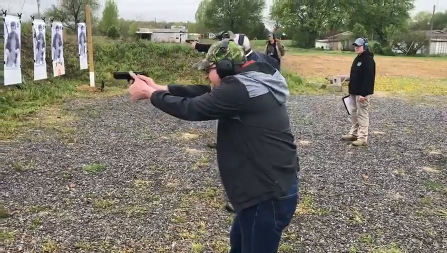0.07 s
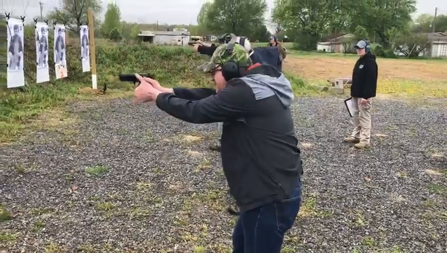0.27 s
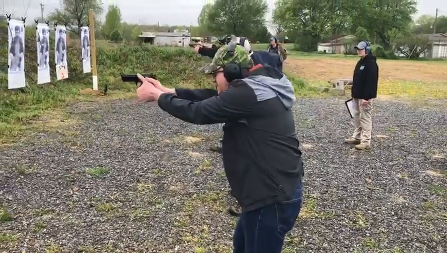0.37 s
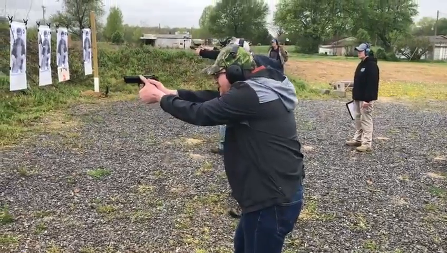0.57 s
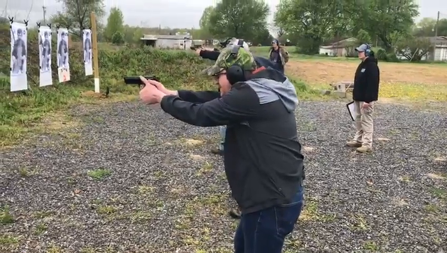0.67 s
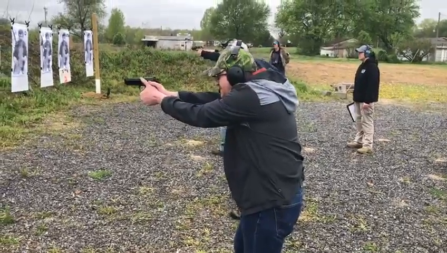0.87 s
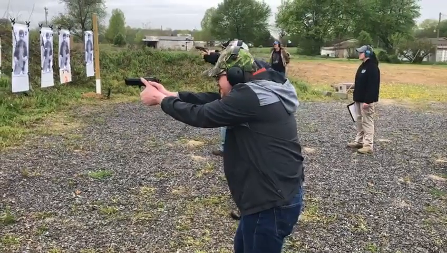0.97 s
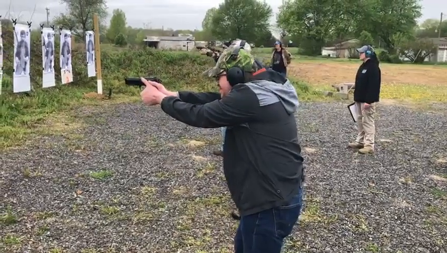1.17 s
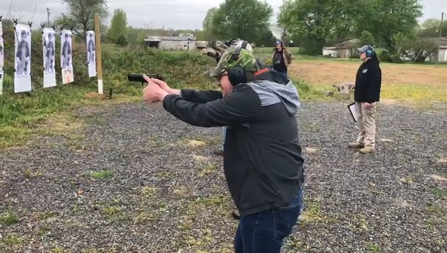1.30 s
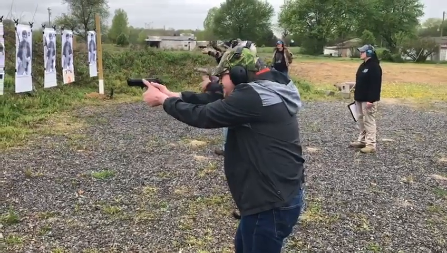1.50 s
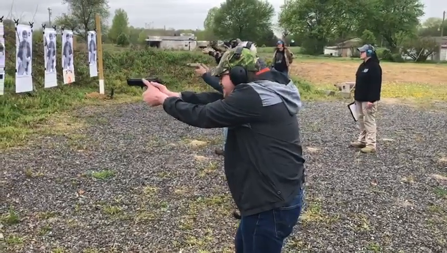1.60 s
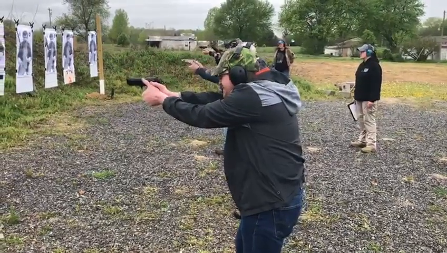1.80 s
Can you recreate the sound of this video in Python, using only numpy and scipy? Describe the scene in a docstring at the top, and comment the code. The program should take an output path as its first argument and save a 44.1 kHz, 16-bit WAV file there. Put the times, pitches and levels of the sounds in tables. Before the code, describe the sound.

Handgun shots outdoors, one alone and then four in quick succession, with short slapping echoes.

```python
"""Five handgun shots on an open gravel range, the microphone a phone a few metres behind the line.
Each bang is a treble crack and a tone that slides down into a short ring, with a wash off the gravel.
Ground, target frames, earth bank and a far tree line send it back as sharp slaps and as swarms of
small echoes, over a little wind rumble and a quiet outdoor floor. The phone rounds the loudest peaks
and cuts the top, and its audio compression puts a brief whistle and hiss just ahead of most bangs."""
import sys
import numpy as np
from scipy import signal
from scipy.fft import rfft, irfft
from scipy.io import wavfile
from scipy.ndimage import uniform_filter1d

SR = 44100
rng = np.random.default_rng(int(sys.argv[2]) if len(sys.argv) > 2 else 0)


def pcm_store(signal):
    """Save signal as 16-bit PCM."""
    levels = np.round(np.clip(np.atleast_2d(signal), -1, 1) * 32767)
    wavfile.write(sys.argv[1], SR, levels.astype(np.int16).T)


N = 81585

# Shots at the line: (time [s], ring level [dB], ring pitch [Hz], ring length [cycles],
# crack level before halving [dB], wash level [dB], wash t60 [s], linger level [dB])
HANDGUN_SHOTS = [(.2552, -9, 950, 7, -7.5, -24, 0.44, -28.5),
                 (0.8749, -5, 623, 5.7, -8.5, -18.5, 0.26, -26.5), (1.1903, -4, 690, 5, -13, -22, 0.2, -36),
                 (1.3047, -5, 553, 8, -9.5, -17.5, 0.26, -34),
                 (1.5458, -4, 580, 3.8, -11.5, -17.5, 0.19, -29.5)]
# Single echoes and far shots:
# (time [s], ring level [dB], ring pitch [Hz], ring length [cycles], crack level before halving [dB])
SLAP_ECHOES = [(0.059, -33.5, 915, 5.7, -75), (0.0781, -29.5, 644, 4.6, -79), (.092, -36, 595, 3.7, -75),
               (0.115, -36.5, 445, 4.1, -75), (.19, -44, 900, 3.6, -71), (.113, -49, 2000, 6, -53.5),
               (.143, -51, 1300, 5, -50), (.232, -20.5, 1000, 6.4, -20.5), (0.2652, -6, 650, 5.2, -21),
               (.351, -13.5, 684, 5, -32), (0.392, -15, 1170, 7.7, -59), (0.453, -21, 800, 5.7, -31),
               (0.699, -38, 1470, 12, -77), (.795, -38, 910, 6.6, -63), (0.8846, -7, 620, 4.2, -17),
               (.971, -12, 653, 3.1, -39), (1.01, -25, 1060, 10.3, -52), (1.073, -20.5, 870, 4.8, -34.5),
               (1.101, -31, 1250, 8.3, -50), (1.196, -17, 900, 5, -19), (1.319, -8, 730, 5.3, -18),
               (1.368, -24, 760, 11, -56), (1.401, -25, 2180, 11, -37), (1.4185, -24.5, 1850, 12, -50),
               (1.4313, -22, 990, 7.8, -28), (1.447, -23, 1100, 5.5, -51), (1.514, -20.5, 955, 6.7, -31),
               (1.533, -14.5, 1060, 9.8, -27), (1.553, -13, 950, 7, -31), (1.5695, -8, 780, 8, -45),
               (1.738, -25.5, 870, 4.9, -45)]
# Echo swarms from close by, the earth bank and the tree line: (peak time [s], level [dB], t60 [s])
NEAR_SWARMS = [(.285, -32, 0.37), (0.914, -23, 0.13), (1.217, -23, 0.11), (1.347, -18, 0.094),
               (1.577, -20.5, 0.1)]
BANK_SWARMS = [(0.352, -27, 0.25), (0.975, -36, 0.27), (1.284, -37.5, 0.8), (1.42, -32.5, 0.13),
               (1.647, -36, 0.16)]
TREE_SWARMS = [(0.476, -33.5, 0.19), (0.611, -55, 0.42), (0.699, -55, 0.96), (1.101, -37.5, 0.17),
               (1.759, -40.5, .3)]
# Those three reflectors, in order: (rise [s], centre [Hz], width [Hz], treble [dB], bass [dB])
REFLECTORS = [(0.025, 310, 992, -13.5, -18), (0.011, 600, 1160, -6, -7.5), (0.019, 640, 1335, -7.5, -7.5)]
# Audio coder's pre-echo: (end [s], rise [dB/s], level [dB], centre [Hz], width [Hz], tone gain [ratio])
CODER_PRE_ECHOES = [(0.254, 1900, -17, 2830, 450, 2.1), (.258, 1700, -18.5, 3180, 350, 1.3),
                    (.253, 1300, -19.5, 1550, 250, 1.67), (0.2595, 1801, -15, 1300, 380, 0.46),
                    (.254, 1300, -14, 308, 250, 0.8), (.256, 1497, -17, 530, 320, 0.5),
                    (.2585, 900, -19.5, 7000, 3500, 0), (0.877, 1507, -21, 420, 500, 0.7),
                    (.879, 2500, -20, 3300, 500, 0.6), (.875, 911, -33.5, 2680, 540, 1.35),
                    (1.19, 1500, -27.5, 400, 250, -0.2), (1.307, 801, -31.5, 1500, 1600, -0.5)]
# Wind rumble at the start, then bass under shots and echoes:
# (centre time [s], level [dB], pitch [Hz], half length [s])
LOW_THUMPS = [(.085, -44, 184, 0.0058), (0.128, -55, 81, .02), (0.191, -55.5, 98, 0.015),
              (0.256, -22, 206, 0.0067), (.362, -29, 193, 0.0096), (0.368, -47, 84, 0.0062),
              (0.812, -61, 148, 0.014), (0.873, -44, 84.4, 0.0089), (0.985, -30.5, 207, 0.006),
              (1.209, -27, 64, 0.013), (1.204, -31, 198, 0.0079), (1.294, -25.5, 213, 0.0044),
              (1.313, -24.5, 280.6, 0.0079), (1.345, -32.5, 63.7, 0.0041), (1.405, -35, 188, 0.0038),
              (1.566, -32, 65, 0.013), (1.649, -31, 203, 0.0073), (1.763, -44.5, 177, 0.016)]
# Spectra of the gravel wash, lingering tail and outdoor floor: (frequency [Hz], relative level [dB])
WASH_SPECTRUM = [(120, -20.5), (200, -9.5), (381, -7), (715, -2), (1160, -21.5), (3360, -17), (7400, -17.5),
                 (8840, -18), (9430, -79), (12300, -35.5), (20700, -120)]
LINGER_SPECTRUM = [(35, -68.5), (60, -29.5), (362, -19.5), (477, -29.5), (810, -11), (1210, -14.5),
                   (5800, -33.5), (8310, -35), (9430, -61), (12300, -94), (20700, -120)]
FLOOR_SPECTRUM = [(24, -44.5), (40, -8), (197, 2), (382, 0), (1540, -5.5), (2160, -10.5), (8600, -17.5),
                  (9400, -40), (12100, -40), (20500, -120)]

GLIDE_HZ, SLAP_GLIDE_HZ, GLIDE_S = 4310, 3300, 0.0007855  # slide from this far above the ring pitch
CRACK_HOLD_S, CRACK_T60_S = 0.0013, 0.008
DULL_DB = 40  # a slap whose crack setting lies this far under its ring no longer slides
SWARM_PER_S, SWARM_SCATTER_DB = 3000, 4


def handgun(t, grit):
    """Shots a few metres off: each a bang, a wash scattered by the gravel and a slower, lingering tail."""
    hiss = noise_band(hz=6500, width_hz=3000)
    wash = coloured(WASH_SPECTRUM) * flicker()
    linger = coloured(LINGER_SPECTRUM) * flicker()
    out = np.zeros(N)
    for at, ring_db, ring_hz, cycles, crack_db, wash_db, wash_t60, linger_db in HANDGUN_SHOTS:
        out += bang(t - at, hiss, grit, GLIDE_HZ, ring_db, ring_hz, cycles, crack_db)
        out += undb(wash_db) * decay(t - at, attack_s=0.00067, t60_s=wash_t60) * wash
        out += undb(linger_db) * decay(t - at, attack_s=0.058, t60_s=0.59) * linger
    return out


def bang(age, hiss, grit, glide_hz, ring_db, ring_hz, cycles, crack_db):
    """A treble crack, then a rough tone that slides down to its ring pitch and dies in a few cycles."""
    age = np.clip(age, 0, 1)
    turns = ring_hz * age + glide_hz * GLIDE_S * (1 - np.exp(-age / GLIDE_S))
    ring = np.sin(2 * np.pi * turns) + 0.4 * grit
    attack = 1 - np.exp(-age / 0.002)
    fade = np.exp(-(age * ring_hz * 2 / cycles) ** 2)
    crack = (age > 0) * undb(-60 * np.maximum(age - CRACK_HOLD_S, 0) / CRACK_T60_S) * hiss
    return undb(ring_db) * attack * fade * ring + undb(crack_db) * crack / 2


def slaps(t, grit):
    """Single echoes and far shots reach the microphone duller; the weaker the crack, the less slide."""
    hiss = noise_band(hz=3800, width_hz=1900)
    out = np.zeros(N)
    for at, ring_db, ring_hz, cycles, crack_db in SLAP_ECHOES:
        glide_hz = SLAP_GLIDE_HZ * np.clip(1 + (crack_db - ring_db) / DULL_DB, 0, 1)
        out += bang(t - at, hiss, grit, glide_hz, ring_db, ring_hz, cycles, crack_db)
    return out


def echo_swarms(t):
    """Each reflector, near to far, returns swarms of small uneven echoes: a rounded rise, then a fall."""
    out = np.zeros(N)
    for rows, reflector in zip((NEAR_SWARMS, BANK_SWARMS, TREE_SWARMS), REFLECTORS):
        rise_s, hz, width_hz, treble_db, bass_db = reflector
        clicks = (rng.random(N) < SWARM_PER_S / SR) * np.sign(rng.standard_normal(N))
        clicks *= undb(SWARM_SCATTER_DB * rng.standard_normal(N))
        body = resonate(resonate(clicks, hz, width_hz), hz, width_hz)
        treble = undb(treble_db) * resonate(np.roll(clicks, N // 3), hz=3010, width_hz=1320)
        bass = undb(bass_db) * resonate(clicks, hz=221, width_hz=153)
        for at, db, t60 in rows:
            age = t - at
            envelope = np.where(age < 0, np.exp(-(age / rise_s) ** 2), undb(-60 * np.abs(age) / t60))
            out += undb(db) * envelope * (body + treble + bass)
    return out


def coder_pre_echo(t):
    """An audio-compression artefact: brief whistle and hiss, rising in level just before a bang."""
    out = np.zeros(N)
    for end, db_per_s, db, hz, width_hz, tone_gain in CODER_PRE_ECHOES:
        age = t - end
        envelope = undb(np.where(age < 0, db_per_s, -6000) * age) * (age > -0.0225)  # starts 22.5 ms early
        tone = tone_gain * np.sin(2 * np.pi * hz * age)
        out += undb(db) * envelope * (noise_band(hz, width_hz) + tone)
    return out


def low_thumps(t):
    """Soft low thumps: wind rumble at the start, then bass under shots and echoes."""
    out = np.zeros(N)
    for at, db, hz, half_s in LOW_THUMPS:
        halves = np.clip((t - at) / half_s, -4, 4)
        turns = hz * half_s * (halves - 0.32 * halves ** 2 / 2)  # pitch sags 32% per half length
        rumble = 0.55 * noise_band(hz, width_hz=hz)
        out += undb(db) * np.exp(-halves ** 2) * (np.sin(2 * np.pi * turns) + rumble)
    return out


def outdoor_floor():
    """The quiet, steady noise of the open range."""
    return undb(-58.5) * coloured(FLOOR_SPECTRUM)


def undb(db):
    """dB to gain."""
    return 10 ** (np.asarray(db, float) / 20)


def unit(x):
    """Scale to rms 1."""
    return x / np.sqrt(np.mean(x ** 2))


def resonate(x, hz, width_hz):
    """Two-pole resonance, applied twice, rms 1."""
    radius = np.exp(-np.pi * width_hz * 1.5 / SR)  # each pass is wider, as two narrow the band
    poles = [1, -2 * radius * np.cos(2 * np.pi * hz / SR), radius * radius]
    once = signal.lfilter([1, -1], poles, x)
    return unit(signal.lfilter([1, 0, -1], poles, once))


def noise_band(hz, width_hz):
    """Noise around one frequency, rms 1."""
    return resonate(rng.standard_normal(N), hz, width_hz)


def coloured(spectrum):
    """Noise shaped to a spectrum table, rms 1."""
    bins_hz = np.maximum(np.arange(N // 2 + 1) * SR / N, 1)
    hz, db = np.array(spectrum, float).T
    gain = undb(np.interp(np.log(bins_hz), np.log(hz), db))
    return unit(irfft(rfft(rng.standard_normal(N)) * gain, N))


def flicker(depth_db=4, rate_hz=61):
    """Gain that wanders quickly by a few dB."""
    window = int(SR / rate_hz)
    wander = uniform_filter1d(uniform_filter1d(rng.standard_normal(N), window), window)
    return undb(depth_db * unit(wander))


def decay(age, attack_s, t60_s):
    """Envelope: silent before age 0, a rise, then an exponential fall."""
    age = np.maximum(age, 0)
    return (1 - np.exp(-age / attack_s)) * undb(-60 * age / t60_s)


def scene():
    """The range from behind the firing line, in mono, with the coder's pre-echo mixed in."""
    t = np.arange(N) / SR
    grit = resonate(noise_band(hz=900, width_hz=1000), hz=900, width_hz=1000)  # roughens every ring
    out = handgun(t, grit) + coder_pre_echo(t) + low_thumps(t)
    out += slaps(t, grit) + echo_swarms(t) + outdoor_floor()
    return out[None]


def record(dry, ceiling=0.75, top_hz=9280, output_top_hz=15800):
    """The phone rounds peaks and cuts the top steeply; its output stage bends and sprays faint treble."""
    rounded = ceiling * np.tanh(dry / ceiling)
    dulled = signal.sosfilt(signal.ellip(10, .2, 80, top_hz, fs=SR, output="sos"), rounded)
    bent = dulled - 0.1 * dulled ** 7
    return signal.sosfilt(signal.ellip(10, .2, 80, output_top_hz, fs=SR, output="sos"), bent)


dry = scene()
out = record(dry)
pcm_store(out)
```